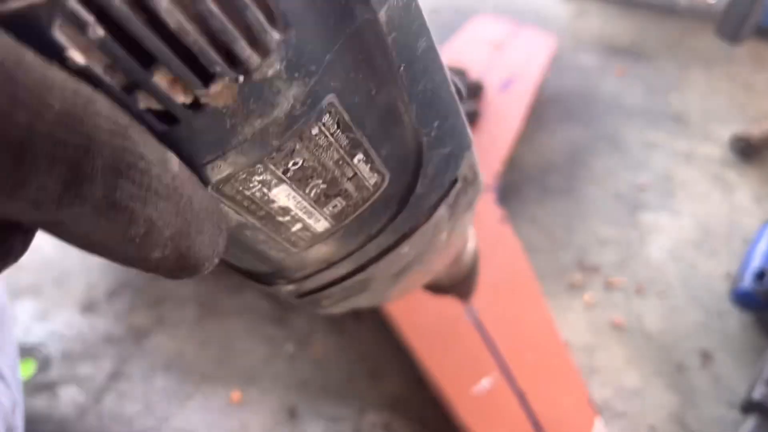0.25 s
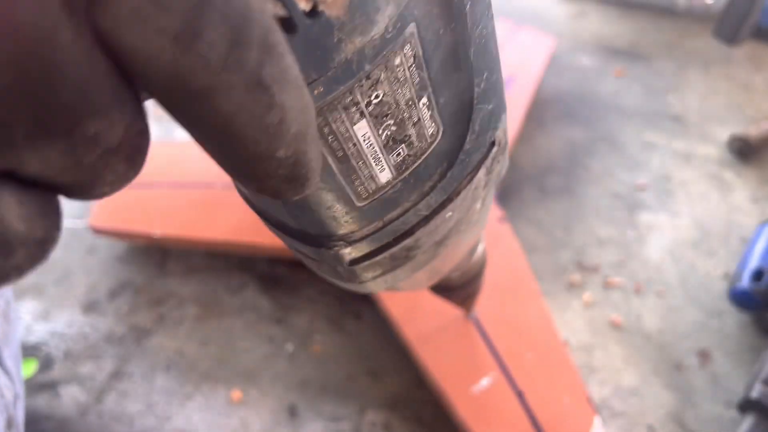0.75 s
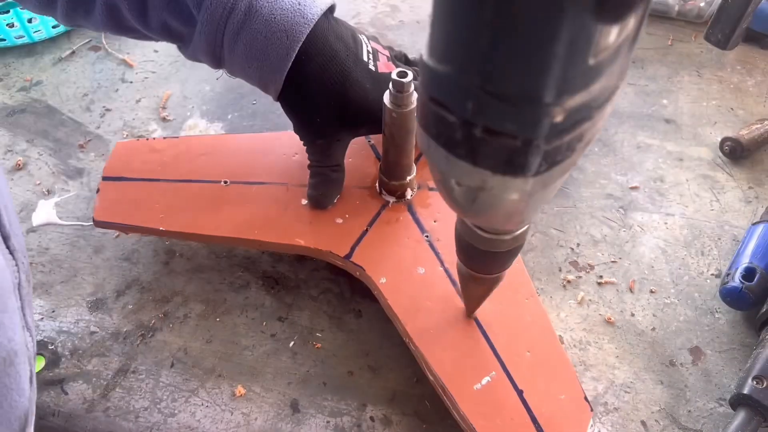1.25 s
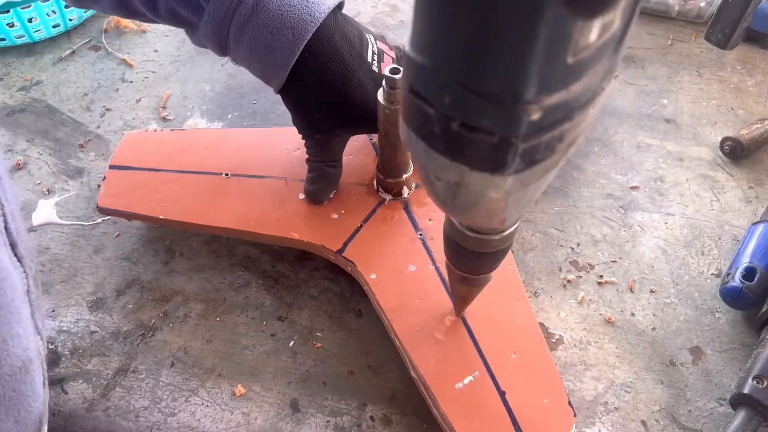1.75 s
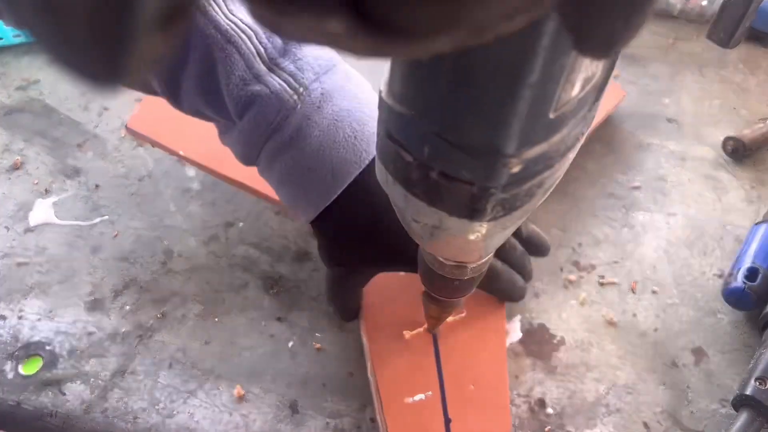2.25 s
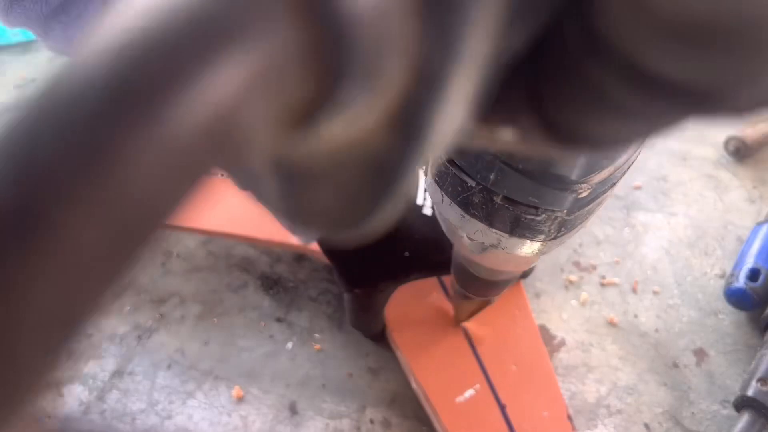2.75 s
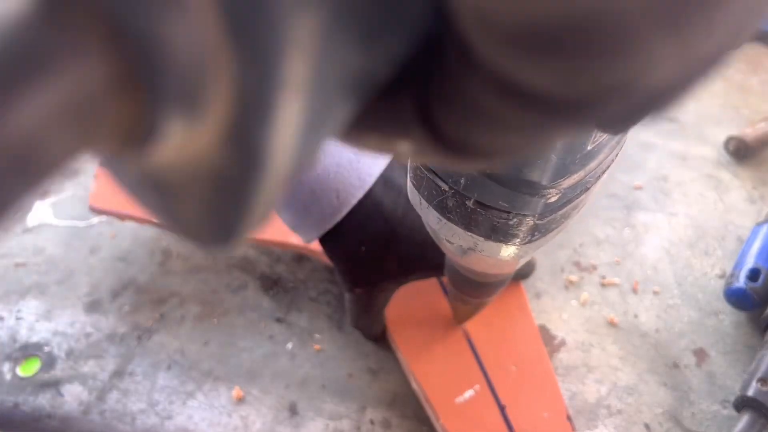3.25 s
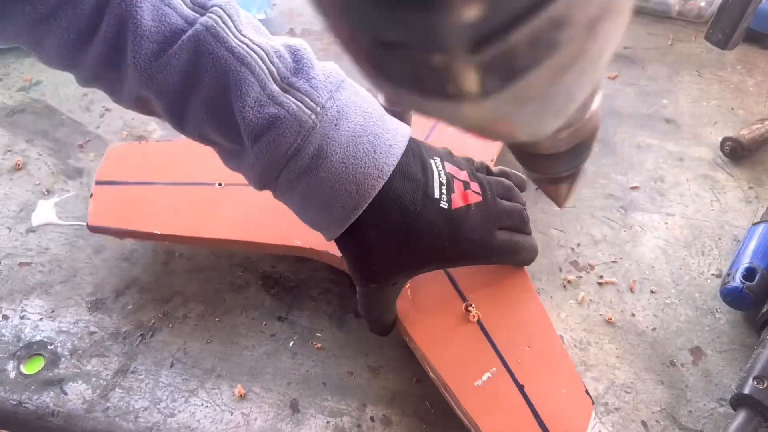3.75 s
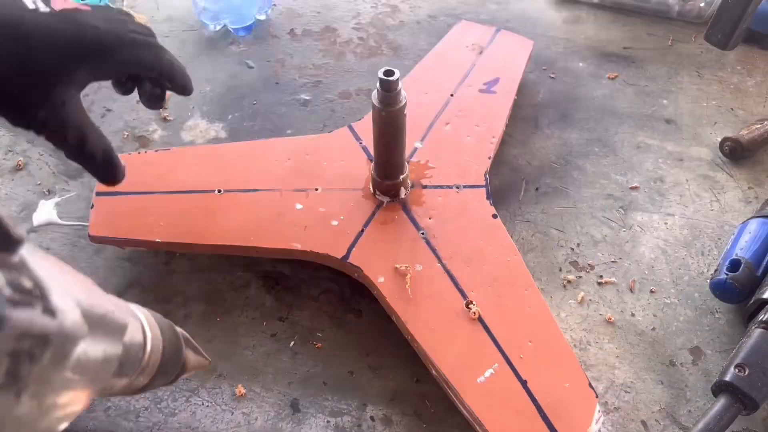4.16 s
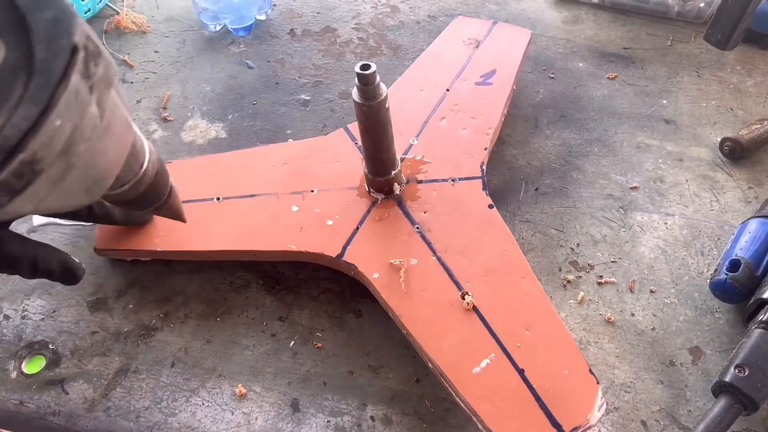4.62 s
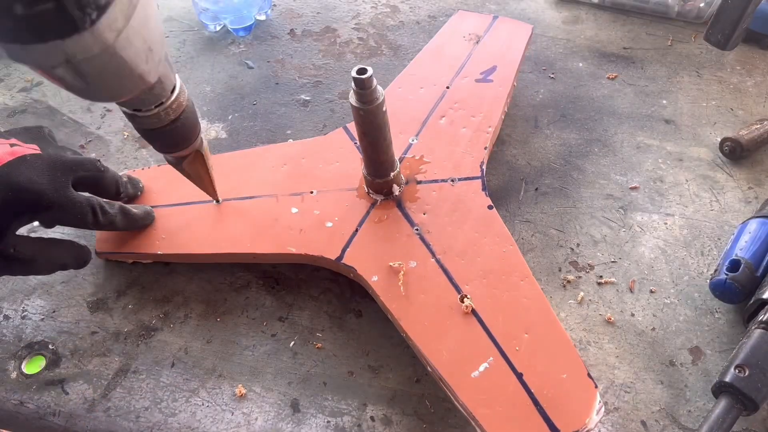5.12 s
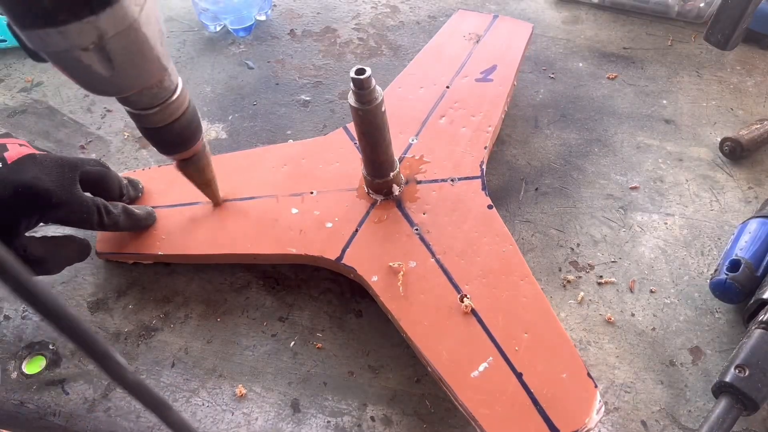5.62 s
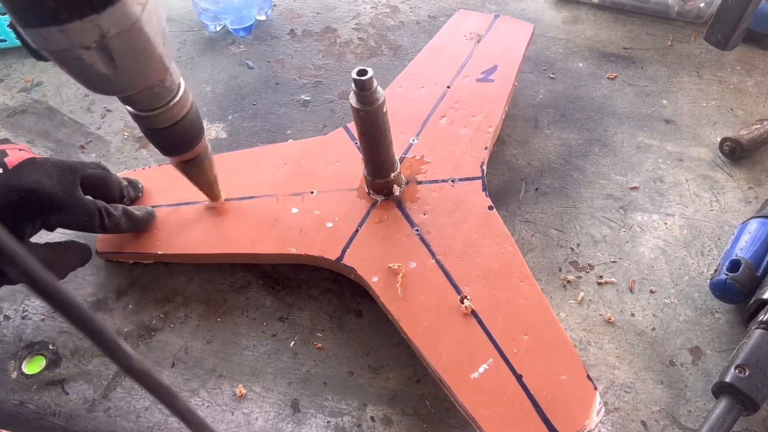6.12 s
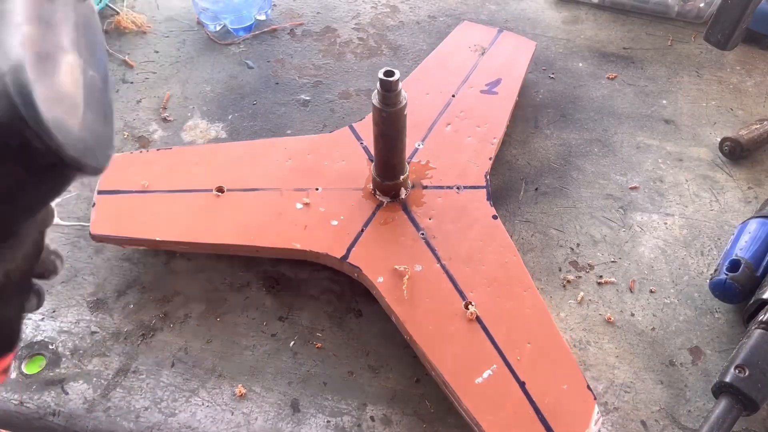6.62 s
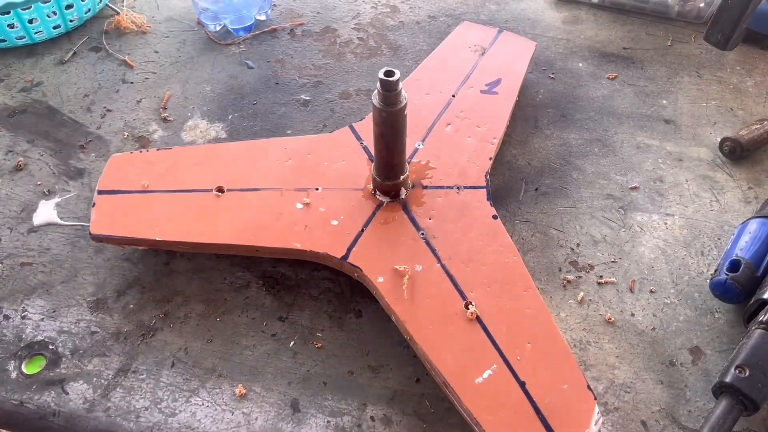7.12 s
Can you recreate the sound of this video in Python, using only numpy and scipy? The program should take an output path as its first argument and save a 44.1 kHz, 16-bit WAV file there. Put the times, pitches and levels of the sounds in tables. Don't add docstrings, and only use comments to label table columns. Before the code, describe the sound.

From 0 to 1.2 s, gloves rustle softly close by while bit and drill tap a thick plastic plate, giving small hollow knocks and short rings. At about 1.25 s a sharp slap and the trigger hum start the drill: a fast shriek upward, then a bright fan-and-brush roar whose whine glides down to a stop near 2.1 s. Rubbing, dull knocks and faint squeaks follow. At 2.9 s it starts again, climbing and holding high until 3.75 s, with slight scraping in the plastic, clicks around 4 s, and a coast-down fading by 4.9 s. Light taps lead to a brief rev at 5.5 s and, at 5.9 s, the fastest, highest one, peaking near 6.2 s and slowing with knocks at 6.15 and 6.6 s. The dying motor ends in loud set-down clacks at 7.2 and 7.33 s. Short hard-room echoes surround everything.

```python
import sys
import numpy as np
from scipy import signal
from scipy.fft import rfft, irfft, next_fast_len
from scipy.io import wavfile
from scipy.ndimage import uniform_filter1d

SR = 44100
rng = np.random.default_rng(int(sys.argv[2]) if len(sys.argv) > 2 else 0)


def store_pcm(level_fs):
    pcm = np.round(np.clip(level_fs, -1, 1) * 32767).astype(np.int16)
    wavfile.write(sys.argv[1], SR, np.atleast_2d(pcm).T)


def nominal_scale(level):
    x = np.asarray(level, float) / 20
    return 10 ** x


N = 325458


def evened(x):
    return x / np.sqrt(np.mean(x ** 2) + 1e-20)


def read(points, hz):
    f, value = np.transpose(points)
    return np.interp(np.log(hz + 1), np.log(f + 1), value)


def add(mix, s, sound):
    part = mix[..., round(s * SR):][..., :sound.shape[-1]]
    part += sound[..., :part.shape[-1]]


def span(rows):
    t = np.arange(rows[0][0], rows[-1][0], 1 / SR)
    return t, np.interp(t, *np.transpose(rows))


def wander(size, smooth):
    return evened(uniform_filter1d(rng.standard_normal(size), max(int(smooth), 1)))


def bumps(peaks, hz):
    return 1 + sum(nominal_scale(db) ** 2 / (1 + (2 * (hz - f) / width) ** 2) for f, width, db in peaks)


def split(x, colour, peaks, edges_hz):
    size = next_fast_len(len(x), real=True)
    hz = np.fft.rfftfreq(size, 1 / SR)
    z = rfft(x, size) * nominal_scale(read(colour, hz)) * np.sqrt(bumps(peaks, hz))
    below = [0 * hz] + [1 / (1 + (hz / e) ** 8) for e in edges_hz] + [1 + 0 * hz]
    return [evened(irfft(z * np.sqrt(b - a), size)[:len(x)]) for a, b in zip(below, below[1:])]


def crackle(size, per_s, spread_db, share):
    struck = rng.random(size) < per_s / SR
    clicks = nominal_scale(spread_db * np.minimum(rng.exponential(1, size), 3.2)) * struck
    share = np.clip(share, 0, 1)
    smooth = np.sqrt(1 - share) * rng.standard_normal(size)
    return smooth + np.sqrt(share) * evened(clicks * rng.standard_normal(size))


def mottle(x, patchy_db):
    z = signal.stft(x, nperseg=1024)[2]
    streaks = uniform_filter1d(rng.standard_normal(z.shape), size=4, axis=0)
    streaks = uniform_filter1d(streaks, size=9, axis=1)
    return evened(signal.istft(z * nominal_scale(patchy_db * evened(streaks)), nperseg=1024)[1][:len(x)])


# t/s, length/s, start
# f/Hz, end f/Hz, level/dB
SQUEAKS = [(1.14, 0.025, 1560, 1560, -56.5), (2.682, 0.039, 2290, 2280, -72), (2.746, .07, 1960, 2030, -77),
           (2.827, .04, 2050, 2050, -74), (2.506, 0.1, 1270, 1340, -74), (2.592, 0.059, 4040, 3950, -73),
           (2.726, 0.11, 4120, 4080, -76), (2.832, 0.14, 4000, 4030, -75), (4.895, 0.038, 1620, 1500, -66),
           (5.035, 0.12, 770, 790, -76), (1.885, .03, 6000, 5700, -58), (1.15, .05, 3900, 3900, -68),
           (.67, 0.047, 1650, 1600, -68.5), (5.55, 0.19, 450, 450, -57.5), (5.767, 0.08, 244, 230, -53),
           (6.147, 0.086, 628, 570, -59), (5.472, .04, 1950, 1900, -76)]


def squeaks():
    out = np.zeros(N)
    for s, length, start_hz, end_hz, db in SQUEAKS:
        hz = np.linspace(start_hz, end_hz, round(length * SR))
        whistle = np.sin(2 * np.pi * np.cumsum(hz) / SR) * signal.windows.tukey(len(hz), .5)
        add(out, s, nominal_scale(db + 3.0 * wander(len(hz), smooth=210)) * whistle)
    return out


# t/s, level/dB
RUSTLE = [
    [(0.0, -67), (0.326, -68.5), (0.55, -62), (0.856, -67), (1.082, -65), (1.25, -61)],
    [(2.1, -70), (2.35, -68.5), (2.628, -72), (2.92, -70)],
    [(4.6, -89), (4.902, -75), (5.158, -81), (5.52, -73.5)],
    [(7.15, -71.5), (7.26, -53), (7.38, -64)],
]
# middle level/dB, high level/dB against the rub
RUB_TILT = [(-13, -13.5), (-9.5, -9.5), (-11, -12), (-22, 3)]
# f/Hz, level/dB per Hz
RUSTLE_COLOUR = [(24, -66), (40, -24.5), (236, -17), (453, -20.5), (582, -22), (728, -15.5), (983, -18.5),
                 (1580, -14.5), (1840, -19), (4520, -20.5), (15800, -21.5)]
# f/Hz, width/Hz, level/dB
PLATE = [(224, 130, 21.5), (450, 43, 21), (735, 50, 14.5), (1240, 190, 6.5), (1700, 87, 4.5)]


def rustle():
    out = np.zeros(N)
    for rows, (middle_db, high_db) in zip(RUSTLE, RUB_TILT):
        t, rub_db = span(rows)
        levels_db = (rub_db, rub_db + middle_db, rub_db + high_db)
        rub = mottle(crackle(len(t), per_s=1600.0, spread_db=3.5, share=0.45), patchy_db=3)
        bands = split(rub, RUSTLE_COLOUR, PLATE, (1000, 3000))
        strokes = [nominal_scale(db + 1.1 * wander(len(t), smooth=1100)) * b for db, b in zip(levels_db, bands)]
        add(out, t[0], sum(strokes) * signal.windows.tukey(len(t), .04))
    return out


# t/s, peak level/dB, decay/s, f/Hz
PINGS = [(0.342, -44.5, 0.17, 237), (.332, -48, .02, 2600), (.332, -55, .015, 5170),
         (.354, -62, .012, 6000), (.369, -62, .012, 5000), (.486, -48, .02, 4500), (.487, -52, .02, 2700),
         (.904, -62, .015, 7000), (1.006, -60, .015, 4200), (1.098, -56, .1, 735), (2.24, -54, 0.13, 735),
         (2.618, -60, .1, 733), (2.911, -58, .012, 8000), (2.896, -46, .01, 11000), (6.4, -53, 0.16, 235),
         (.343, -52, .1, 688), (0.489, -45.5, 0.18, 242), (.49, -49, 0.068, 450), (0.584, -68, .012, 3500),
         (.709, -58, 0.089, 714), (0.905, -62, .02, 1800), (1.007, -53.5, 0.098, 240),
         (1.285, -34, 0.051, 5970), (2.257, -64, .015, 7500), (2.274, -60, .015, 7800),
         (2.35, -64, 0.014, 7800), (2.496, -64, 0.014, 4500), (2.512, -65, 0.013, 4200),
         (2.603, -63, .02, 6000), (2.668, -67, 0.014, 8500), (2.897, -39.5, 0.0079, 6460),
         (3.951, -54.5, 0.19, 199), (4.009, -55, 0.095, 172), (4.674, -61, .15, 240),
         (4.676, -62, .012, 2500), (4.828, -64, 0.13, 239), (5.034, -65, 0.071, 1230),
         (5.035, -62, .07, 1510), (5.057, -52.5, 0.067, 1580), (5.057, -60, 0.033, 2180),
         (5.057, -59.5, 0.022, 2780), (5.255, -60.5, .02, 1100), (5.058, -61.5, 0.011, 5500),
         (5.246, -62, 0.18, 659), (5.246, -66, .2, 228), (5.383, -54.5, 0.17, 238.5),
         (5.382, -70.5, 0.009, 4480), (5.345, -66.5, .015, 7000), (6.148, -32, 0.039, 186),
         (7.329, -40, 0.017, 5100)]


def pings():
    out, t = np.zeros(N), np.arange(8192) / SR
    for s, db, t60, hz in PINGS:
        add(out, s, nominal_scale(db - 60 * t / max(t60, .005)) * np.sin(2 * np.pi * hz * t))
    return out


# t/s, peak level/dB, decay/s, ring f/Hz
RINGS = [(0.33, -30, 0.26, 686), (0.417, -39.5, 0.32, 760), (0.485, -28.5, 0.13, 735),
         (0.708, -44.5, 0.59, 730), (0.778, -35.5, 0.13, 764), (1.066, -44, 1, 1340),
         (2.24, -38.5, 0.26, 740), (2.514, -76, 0.14, 1380), (2.676, -44, 0.15, 750),
         (6.137, -39, 0.061, 1000), (6.578, -27.5, 0.066, 1890), (6.671, -28.5, 0.18, 660),
         (7.208, -15.5, 0.21, 630)]
THUDS = [(0.392, -42, 0.13, 1580), (0.616, -53, 0.47, 680), (0.904, -44, 0.086, 805),
         (1.005, -41.5, 0.056, 810), (1.639, -30, 0.084, 700), (1.886, -48, .06, 600),
         (1.931, -52, 0.24, 725), (2.559, -51, 0.094, 1340), (6.145, -42, 0.034, 400),
         (2.893, -34.5, 0.28, 666), (4.675, -50, 0.17, 620), (5.244, -54, 0.18, 682),
         (5.381, -51.5, 0.19, 595)]
TICKS = [(0.002, -45.5, 0.26, 674), (0.208, -56, 0.05, 1860), (0.57, -49.5, 0.038, 760),
         (0.06, -55, .03, 1500), (0.077, -57, 0.036, 1500), (0.355, -64, .03, 1500), (0.37, -60, .03, 1500),
         (0.388, -46, 0.027, 1500), (1.063, -42.5, 0.0086, 3840), (2.505, -67, .03, 1400),
         (5.09, -72, .03, 1400), (2.598, -57.5, 0.93, 1920), (4.008, -32, 0.03, 6000),
         (4.047, -29.5, 0.036, 5950), (5.318, -63, 0.16, 850), (5.344, -58, 0.064, 855),
         (5.155, -58, 0.38, 740), (7.328, -19.5, 0.12, 1260)]
SLAPS = [(1.249, -22.5, 0.063, 1650), (2.186, -55, 0.21, 770), (2.348, -55.5, 0.069, 678),
         (4.83, -46, 0.18, 1280), (4.703, -50, 0.052, 600), (4.3, -56, 0.11, 870),
         (5.255, -59.5, 0.059, 1100), (0.71, -54, .05, 700), (0.63, -53, .04, 900)]
CHIMES = [(1.096, -37, 0.17, 729), (2.617, -44, 0.3, 735), (4.0, -31, .55, 1250), (5.034, -45, 0.12, 1300),
          (5.057, -40, 0.15, 1590), (5.14, -44, 0.3, 740), (5.39, -46, .12, 1500)]
# thud level/dB, tick level/dB against the peak
KINDS = [(-15, -20.5), (-3.5, -19.5), (-23, -7), (-2.5, -9.5), (-56, -28.5)]


def knocks():
    out, t = np.zeros(N), np.arange(8192) / SR
    tables = (RINGS, THUDS, TICKS, SLAPS, CHIMES)
    rows = [(*row, *kind) for table, kind in zip(tables, KINDS) for row in table]
    colour = [(60, -32.5), (200, -21.5), (3000, -21.0), (15000, -24.0)]  # f/Hz, level/dB
    edges_hz = rng.uniform(3300, 5530, len(rows))
    slow, quick = 1 - np.exp(-t / .004), 1 - np.exp(-t / .0012)
    for (s, db, t60, hz, thud_db, tick_db), edge_hz in zip(rows, edges_hz):
        spot = PLATE + [(hz, 220, 21 - 0.6 * max(db + 39, 0)), (edge_hz, 900, 8)]
        thud, ring, tick = split(rng.standard_normal(len(t)), colour, spot, (600, 2200))
        after = np.maximum(t / max(t60, .01) - .06, 0)
        blow = nominal_scale(thud_db - 60 * after) * slow * thud + nominal_scale(-12.0 - 60 * after) * quick * ring
        snap = nominal_scale(-60 * t / 0.0093) + nominal_scale(-4.0 - 96 * after)
        add(out, s + .001, nominal_scale(db - 10.5) * (blow + nominal_scale(tick_db + 6.0) * snap * tick))
    return out


# t/s, rotor f/Hz
SPEED = [
    [(1.27, 320), (1.307, 485), (1.344, 678), (1.38, 769), (1.472, 658), (1.6, 510), (1.728, 387),
     (1.92, 218), (2.14, 28)],
    [(2.94, 270), (3.04, 497), (3.098, 627), (3.162, 716), (3.226, 776), (3.354, 837), (3.546, 862),
     (3.77, 832), (3.802, 805)],
    [(5.53, 340), (5.562, 505), (5.595, 665), (5.624, 730), (5.65, 700), (5.752, 579)],
    [(5.914, 372), (5.965, 725), (6.008, 855), (6.072, 945), (6.175, 1018), (6.264, 873), (6.328, 791),
     (6.392, 726), (6.648, 526)],
]
# first turn t/s, last turn t/s
RUNS = [(1.27, 2.14), (2.94, 4.94), (5.53, 7.38)]
FRICTION_HZ_PER_S, FAN_DRAG_PER_S, STALL_HZ = 555, .31, 25


def speed(t):
    rows = np.concatenate(SPEED)
    hz, rest = np.interp(t, *rows.T), FRICTION_HZ_PER_S / FAN_DRAG_PER_S
    for (last_s, last_hz), (_, stop_s) in zip((SPEED[0][-1], SPEED[1][-1], SPEED[3][-1]), RUNS):
        free = (last_hz + rest) * np.exp(-FAN_DRAG_PER_S * (t - last_s)) - rest
        coasting = (t > last_s) & (t < stop_s + .1)
        hz = np.where(coasting, np.maximum(free, STALL_HZ), hz)
    return uniform_filter1d(hz, size=1200)


# pressed t/s, released t/s, hum level/dB, octave level/dB
SQUEEZES = [
    (1.237, 1.36, -31.5, -38),
    (2.899, 3.731, -35, -37),
    (5.501, 5.626, -41.5, -45.5),
    (5.911, 6.143, -79, -54),
]
HUM_HZ = 280
UNLOADED_HZ, SLIP_DB = 934, 24.5
PULL_S, PULL_DB, DROP_DB_PER_S = 0.054, -23, 429.5


def hum():
    out = np.zeros(N)
    for pressed, released, db, octave_db in SQUEEZES:
        t = np.arange(pressed, released + 0.023, 1 / SR)
        current_db = SLIP_DB * np.log10(np.clip(1 - speed(t + 0.022) / UNLOADED_HZ, .05, 1))
        current_db += PULL_DB * np.clip(1 - (t - pressed) / PULL_S, 0, 1)
        current_db -= DROP_DB_PER_S * np.maximum(t - released, 0)
        pull = nominal_scale(db) * np.sin(2 * np.pi * HUM_HZ * t) + nominal_scale(octave_db) * np.sin(4 * np.pi * HUM_HZ * t)
        add(out, t[0], np.sqrt(2) * nominal_scale(current_db) * pull * np.minimum((t - pressed) / 0.042, 1))
    return out


# pressed t/s, lifted t/s, scrape level/dB, beat level/dB
BITE = [(1.537, 1.57, -77, -100), (3.282, 3.773, -62, -85), (3.943, 4.01, -69, -89.5),
        (6.03, 6.237, -63, -54.5)]
BITE_DB_PER_S, CLEAR_DB = 181, -91


def bite(t):
    presses = []
    for pressed, lifted, *level in BITE:
        away_s = np.maximum(np.maximum(pressed - t, t - lifted), 0)
        presses.append(np.array(level)[:, None] - BITE_DB_PER_S * away_s)
    return np.maximum(np.max(presses, axis=0), CLEAR_DB)


COMB_DB, COMB_FADE_DB, COMB_SPREAD_DB = -5.5, -5, 4


def worn_bars(turn, hz):
    draws, comb = rng.standard_normal((56, 2)), np.zeros(len(hz))
    for k, (a, b) in enumerate(draws, 12):
        heard = k * hz < 15800
        comb[heard] += nominal_scale(COMB_SPREAD_DB * a) * np.sin(k * turn[heard] + 3 * b)
    return nominal_scale(COMB_DB + COMB_FADE_DB * np.log2(np.maximum(hz, 200) / 300)) * comb / 7


# t/s, level/dB
ROAR = [
    [(1.262, -47), (1.28, -45), (1.29, -37), (1.306, -36.5), (1.394, -40), (1.75, -46.5), (2.06, -54),
     (2.15, -73)],
    [(2.93, -67.5), (2.97, -43.5), (3.1, -38), (3.73, -46), (3.8, -48.5), (4.02, -47.5), (4.14, -51.5),
     (4.35, -59.5), (4.64, -62), (4.89, -70.5), (4.96, -91)],
    [(5.48, -84), (5.532, -60), (5.543, -45.5), (5.56, -43), (5.9, -45), (6.098, -39), (6.394, -48),
     (6.782, -54), (6.95, -59), (7.1, -64.5), (7.2, -65.5)],
]
# f/Hz, level/dB per Hz
ROAR_COLOUR = [(47, -50.5), (95, 7.5), (276, -12), (385, -16), (548, -12.5), (1270, -11), (1890, -10),
               (3840, 1.5), (7290, 1.5), (13200, -4.5), (15800, 0)]
# f/Hz, width/Hz, level/dB
TILTED = [
    [(1850, 400, 16.5), (3770, 120, 19.5), (4460, 670, 13), (5750, 250, 15.5), (6700, 290, 13.5),
     (9490, 450, 9.5), (13200, 1800, 20)],
    [(1760, 470, 25), (4450, 500, 11.5), (5770, 560, 18.5), (6700, 270, 8), (8200, 390, 12.5),
     (10200, 400, 5), (12900, 2200, 11.5)],
    [(1860, 330, 21), (4380, 140, 20), (5980, 800, 19), (9500, 710, 21.5), (11460, 330, 30),
     (12700, 970, 27), (13900, 1200, 29)],
]
# half tilted t/s, length of the move/s
TILT = [(1.52, 0.26), (4.15, 0.18), (6.42, 0.29)]
# level/dB an octave of speed, level/dB under full strain, level/dB at 600 Hz in run 1, 2, 3
BANDS = [(-0.4, 5.5, -19.5, -17.5, -19.5), (2, -8.5, -17.5, -19, -13.5), (8, -1, 0, -2.5, -8.5),
         (7.5, 2.5, -0.5, -3, -6), (-1, -8, -7, 4, -3)]
SPINDLE = .1035
STRAIN_HZ_PER_S = 2300


def roar(run, rows, housing, t_turns, turns):
    t, db = span(rows)
    hz = speed(np.maximum(t, t_turns[0]))
    strain = np.clip(np.gradient(hz) * SR / STRAIN_HZ_PER_S, 0, 1)
    strain = uniform_filter1d(strain, size=3000, mode="nearest")
    rumble_db, gear_db, housing_db, hiss_db, fizz_db = (
        rise * np.log2(hz / 600) + push * strain + dbs[run] for rise, push, *dbs in BANDS)
    turn = 2 * np.pi * np.interp(t, t_turns, turns)
    throb = (1 + 0.15 * np.cos(turn)) * (1 + 0.041 * np.cos(SPINDLE * turn))
    throb = throb * nominal_scale(0.38 * wander(len(t), smooth=580))
    air = mottle(crackle(len(t), per_s=4000., spread_db=2.2, share=0.15), patchy_db=2.6)
    source = throb * air + worn_bars(turn, hz)
    edges_hz = (220, 900, 1450, 3000, 8000, 11000)
    facing = split(source, ROAR_COLOUR, housing, edges_hz)
    away = split(source, ROAR_COLOUR, TILTED[run], edges_hz)
    middle_s, move_s = TILT[run]
    tilt = np.clip(.5 + (t - middle_s) / move_s, 0, 1)
    bands = [(1 - tilt) * a + tilt * b for a, b in zip(facing, away)]
    pressed_db = .35 * (bite(t)[0] + 65)
    levels_db = (rumble_db - 13.5 + pressed_db, rumble_db + 8.5, gear_db, housing_db, 0, hiss_db, fizz_db)
    mix = sum(nominal_scale(db + d) * b for d, b in zip(levels_db, bands))
    return t[0], mix * signal.windows.tukey(len(t), .015)


# level/dB an octave of speed, level/dB at 800 Hz in squeeze 1, 2, 3, 4
DRIVEN = [(-5, -55, -52, -55, -48), (6, -55, -49, -64, -54), (16, -53, -49.5, -57, -44),
          (-1.5, -46.5, -49.5, -56, -53), (9, -57, -57, -58, -67), (.1, -60, -72, -73, -73),
          (6, -55, -58, -55, -57)]
# level/dB an octave of speed, level/dB at 500 Hz after squeeze 1, 2, 3, 4
COASTING = [(14, -52.5, -55.5, -57, -66), (14, -70, -74, -65, -74), (19, -60, -82, -64, -71),
            (7, -51, -66, -68, -72), (6, -47.5, -56.5, -64, -58), (7, -52, -59, -73, -65),
            (5, -53, -79, -59, -81)]
LEAN = [13, 9, -9, 30, 0, 0, 0]
LET_GO_S, HUSH_HZ, HUSH_DB = .11, 170, -26


def strengths(t, hz):
    pressed, released = np.transpose(SQUEEZES)[:2]
    which = np.searchsorted(pressed, t) - 1
    power = np.exp(-np.maximum(t - released[which], 0) / LET_GO_S)
    on, off = np.array(DRIVEN), np.array(COASTING)
    on_db = (on[:, :1] + np.outer(LEAN, which == 3)) * np.log2(hz / 800) + on[:, 1 + which]
    off_db = off[:, :1] * np.log2(hz / 500) + off[:, 1 + which]
    db = uniform_filter1d(power * on_db + (1 - power) * off_db, size=2000, axis=1)
    return db + HUSH_DB * np.clip(1 - hz / HUSH_HZ, 0, 1)


# multiple of the rotor, level/dB
MESH = [(4, 0), (20, -12), (6, -14)]
# multiple of the rotor, level/dB
BARS = [(24, 0), (25, -13), (30, -11), (33, -6), (35, -10), (36, -7), (40, -11), (42, -11), (60, -12),
        (72, -12)]
# multiple of the rotor, level/dB
BALLS = [(3.455, -3), (6.91, 0), (10.365, -1), (17, -5), (8, -3), (16, -5), (28, -8)]
# f/Hz, level/dB
CASE = [(450, 0), (640, 3), (720, -6), (760, -8), (790, -5), (815, -11), (850, -2), (930, 0)]
# f/Hz, level/dB
VENT = [(450, 2), (700, 4), (1000, 0), (2500, -8), (3300, -2), (3750, 2), (5200, -1), (5900, 6), (6700, -2),
        (11000, 0)]
BEAT = 1 - 2 * SPINDLE
CASE_SHARE = .15
SPIN_UP_HUSH_DB, SPIN_UP_HZ_PER_S = -3, 2800
SHRIEK_HZ, SHRIEK_WIDTH_HZ, SHRIEK_DB = 6300, 1500, [-38, -44, -46, -49]


def tones(start, stop, housing, end_hz):
    t = np.arange(start, stop, 1 / SR)
    hz = speed(t)
    turns = np.cumsum(hz) / SR
    rotor_db, twice_db, mesh_db, slot_db, bar_db, octave_db, ball_db = strengths(t, hz)
    scrape_db, beat_db = bite(t)
    # multiple of the rotor, level/dB
    family = [(1, rotor_db + read(CASE, hz)), (2, twice_db), (12, slot_db)]
    family += [(48, octave_db), (96, octave_db + 5)]
    family += [(SPINDLE, scrape_db - 14.5), (2 * SPINDLE, scrape_db), (BEAT, beat_db)]
    family += [(k * SPINDLE, scrape_db - 4.5) for k in (5, 6, 7)]
    for table, level_db in ((MESH, mesh_db), (BARS, bar_db), (BALLS, ball_db)):
        family += [(k, level_db + db) for k, db in table]
    squeeze = np.searchsorted(np.transpose(SQUEEZES)[0], t) - 1
    detune = (12 * hz - SHRIEK_HZ) / SHRIEK_WIDTH_HZ
    slowing = np.gradient(hz) <= 0
    family += [(12, np.take(SHRIEK_DB, squeeze) - 10 * detune ** 2 - 60 * slowing)]
    climb = uniform_filter1d(np.gradient(hz), size=1000) * SR / SPIN_UP_HZ_PER_S
    climb = np.clip(climb, 0, 1) ** 4
    out, grid_hz = np.zeros(len(t)), np.arange(0, 16000, 20.)
    shell_db = CASE_SHARE * 10 * np.log10(bumps(housing, grid_hz) / 8) + read(VENT, grid_hz)
    for k, db in family:
        depth_db = 1.7 if k < 2 else 1.05 * np.log(2 + k) + 2.5 * (k % 1 > 0)
        flutter_db = depth_db * wander(len(t), smooth=650)
        slip = 0.013 * np.sqrt(k) * wander(len(t), smooth=200)
        floor_hz = max(end_hz, 7500 * (k > 24) + 2500 * (k == 33))
        fade_db = -9 * (k > 20) * np.clip((floor_hz - k * hz) / 700, 0, 2)
        lift_db = (np.interp(k * hz, grid_hz, shell_db) + SPIN_UP_HUSH_DB * climb) * (k > 2)
        sine = np.sin(2 * np.pi * (k * turns + slip)) * (k * hz < 15800)
        out += nominal_scale(db + flutter_db + fade_db + lift_db) * sine
    return t, np.sqrt(2) * out * signal.windows.tukey(len(t), .03), turns


# f/Hz, width/Hz, level/dB
HOUSING = [
    [(1890, 300, 14), (3700, 81, 2.5), (4470, 700, 7.5), (5560, 640, 7.5), (9140, 430, -2),
     (13400, 2100, 13.5)],
    [(1960, 410, 18), (4020, 1500, 10), (5710, 520, 10), (8430, 320, 6), (10080, 410, -20.5),
     (13300, 1760, 10.5)],
    [(2010, 460, 27), (3810, 380, 22), (5380, 670, 24), (6750, 130, 25), (12230, 810, 33),
     (14600, 1440, 32.5)],
]
PAN_DB = [-1.5, -1, -0.5]
WHINE_END_HZ = [8800, 4700, 5400]


def drill():
    out = np.zeros((2, N))
    for run, (rows, housing, pan_db) in enumerate(zip(ROAR, HOUSING, PAN_DB)):
        t, lines, turns = tones(*RUNS[run], housing, WHINE_END_HZ[run])
        s, noise = roar(run, rows, housing, t, turns)
        place = nominal_scale([[pan_db / 2], [-pan_db / 2]])
        add(out, s, noise * place)
        add(out, t[0], lines * place)
    return out


# f/Hz, side against mid level/dB
WIDTH = [(60, -15.5), (130, -13), (290, -19), (640, -17.5), (1410, -10.5), (3100, -9.5), (7200, -6.5),
         (15000, -7.5)]


def scene():
    near = drill() + hum() + rustle() + knocks() + squeaks() + pings()
    t = np.arange(8192) / SR
    echoes = rng.standard_normal(len(t)) * nominal_scale(-60 * t / .3)
    width = nominal_scale(read(WIDTH, np.fft.rfftfreq(len(t), 1 / SR)))
    echoes = irfft(rfft(echoes / np.linalg.norm(echoes)) * width)
    side = signal.oaconvolve(near.mean(0), echoes)[:N]
    own_hiss = nominal_scale(-93) * rng.standard_normal((2, N))
    return near + side * np.array([[1], [-1]]) + own_hiss


# f/Hz, share of time kept wide in loud, middling, quiet sound
KEPT_WIDE = [(150, .25, .08, .4), (500, .5, .2, .8), (900, .85, .3, .95), (2400, .85, .25, .97),
             (3300, .5, .45, .97), (4400, .4, .3, .9), (4800, .03, .03, .2), (5900, .03, .03, .2),
             (6500, .97, .85, 1), (8800, .92, .8, 1), (9700, .15, .1, .95), (12300, .2, .1, .95),
             (13200, .9, .7, .95), (15500, .55, .5, .6)]
LOUD_DB, STANDS_OUT_DB = [-58, -45], 7


def fold(x):
    mid, side = (x[0] + x[1]) / 2, (x[0] - x[1]) / 2
    hz, t, z = signal.stft(side, SR, window="cosine", nperseg=2048, noverlap=1024)
    band = np.unique((9 * np.log(1 + hz / 500)).astype(int), return_inverse=True)[1]
    count = np.bincount(band)
    centre_hz = np.bincount(band, hz) / count
    power = np.add.reduceat(abs(z) ** 2, np.cumsum(count) - count) / count[:, None]
    power_db = 10 * np.log10(power + 1e-20)
    above_db = power_db - uniform_filter1d(power_db, size=5, axis=0)
    stands_out = (above_db > STANDS_OUT_DB) & (centre_hz[:, None] > 300)
    mid_power = uniform_filter1d(mid ** 2, size=4096)[np.minimum(t * SR, N - 1).astype(int)]
    loud = np.searchsorted(nominal_scale(LOUD_DB) ** 2, mid_power)
    f, *shares = np.transpose(KEPT_WIDE)
    share = np.array([np.interp(centre_hz, f, s) for s in shares[::-1]])[loud].T
    luck = uniform_filter1d(rng.standard_normal(share.shape), size=4, axis=1)
    luck = uniform_filter1d(luck, size=2, axis=0)
    kept = (luck.argsort(1).argsort(1) < share * len(t)) | stands_out
    side = signal.istft(z * kept[band], window="cosine", nperseg=2048, noverlap=1024)[1][:N]
    return np.array([mid + side, mid - side])


def band_limit(x):
    return signal.sosfilt(signal.butter(12, 16830, fs=SR, output="sos"), x)


def record(dry):
    bass_cut = signal.sosfilt(signal.butter(2, 105, "high", fs=SR, output="sos"), dry)
    top_cut = signal.firwin(255, 15900, window=("kaiser", 8), fs=SR)
    mix = fold(signal.oaconvolve(bass_cut, top_cut[None], "same"))
    return band_limit(mix)


dry = scene()
out = record(dry)
store_pcm(out)
```